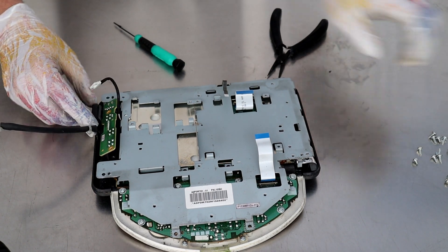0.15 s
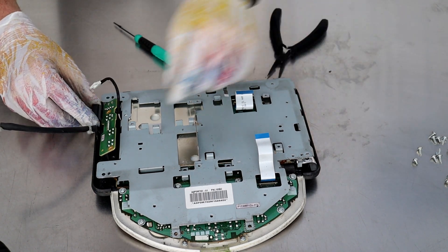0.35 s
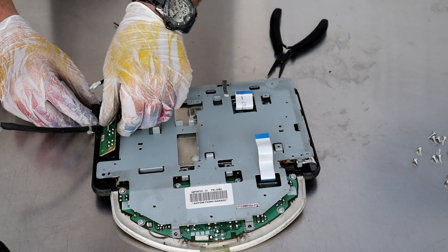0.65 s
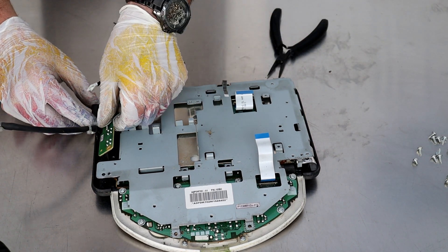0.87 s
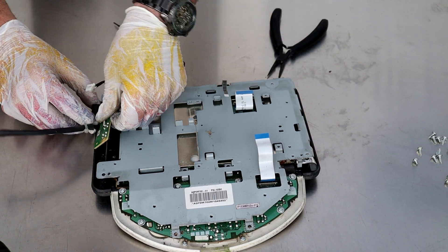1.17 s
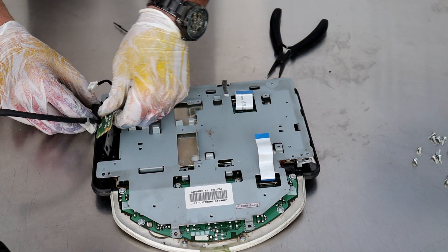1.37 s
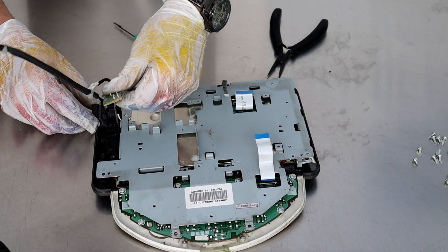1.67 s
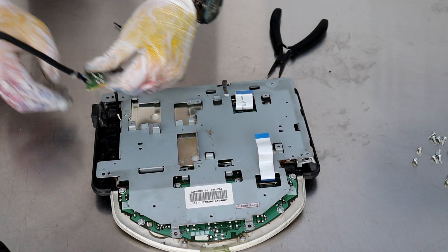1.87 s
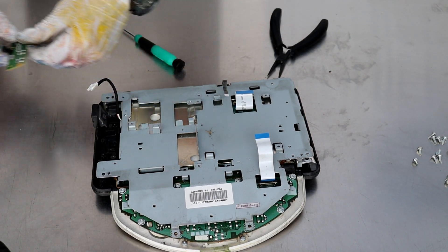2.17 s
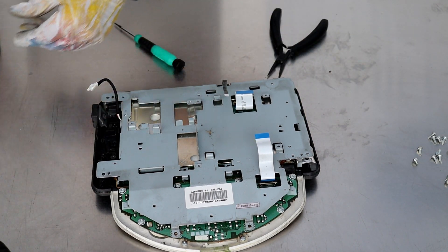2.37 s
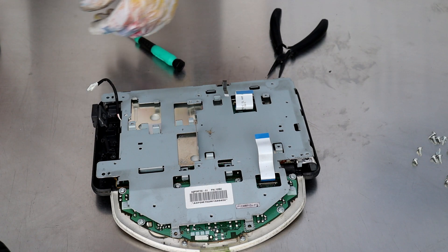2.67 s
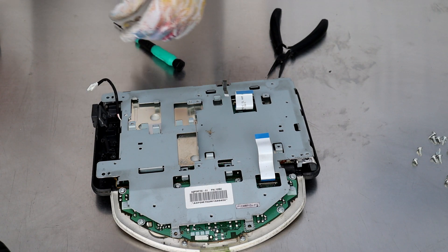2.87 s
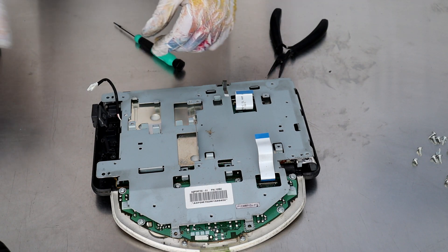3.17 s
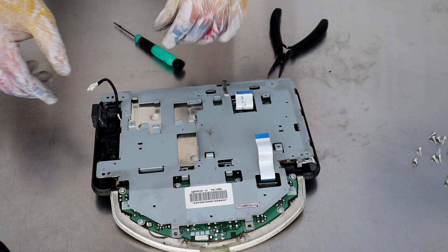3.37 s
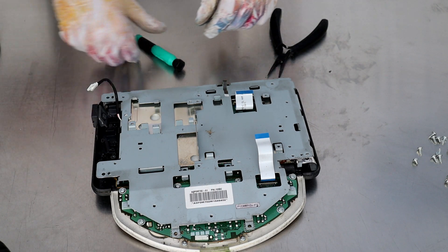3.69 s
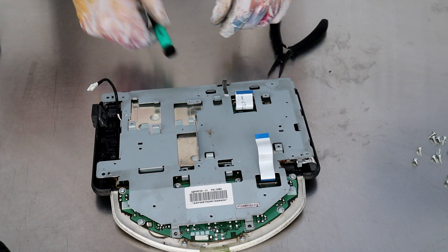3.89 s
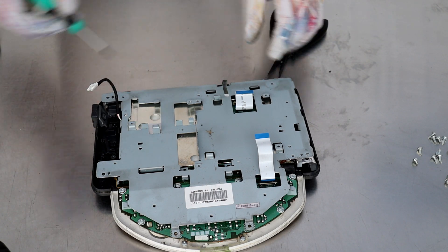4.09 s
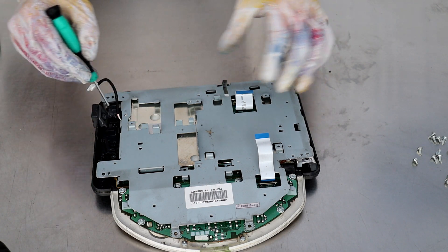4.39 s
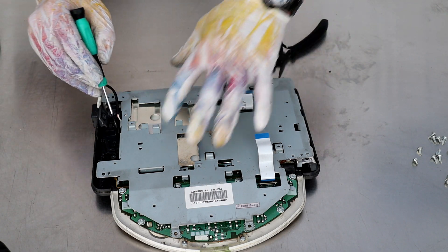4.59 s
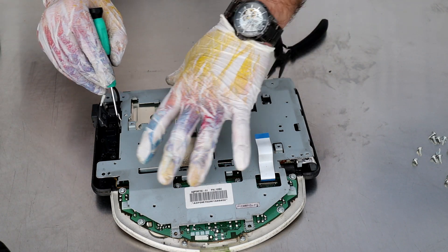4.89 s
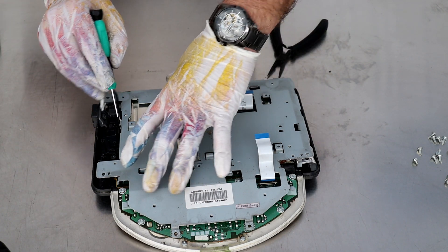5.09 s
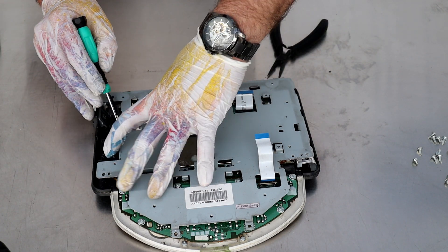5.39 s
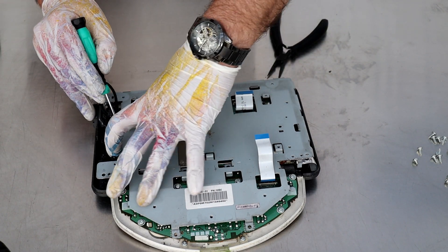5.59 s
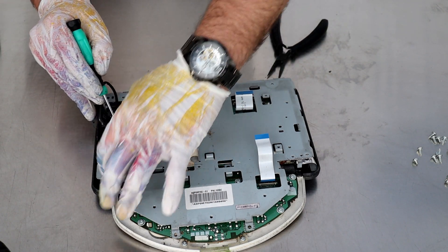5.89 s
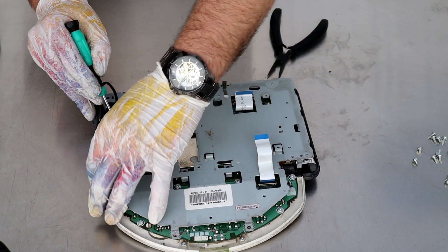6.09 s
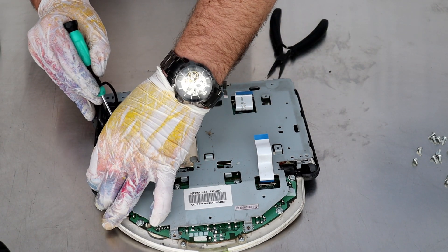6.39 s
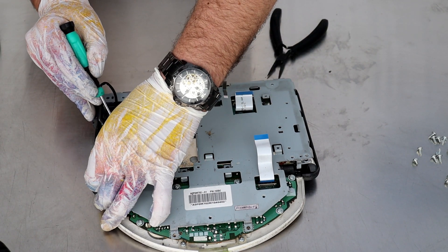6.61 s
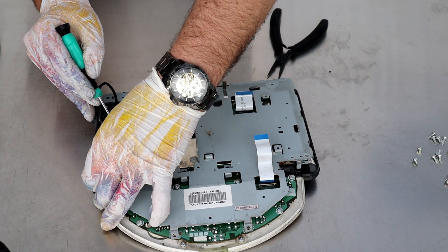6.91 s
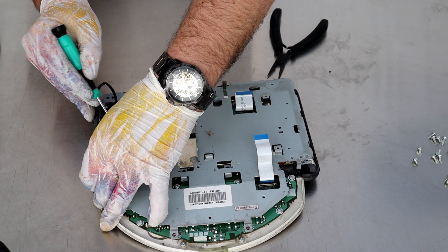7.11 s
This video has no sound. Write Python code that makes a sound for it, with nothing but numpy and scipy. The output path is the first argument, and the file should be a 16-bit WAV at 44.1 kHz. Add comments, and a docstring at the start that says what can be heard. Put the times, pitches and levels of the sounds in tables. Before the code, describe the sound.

Gloved hands work a metal and plastic panel on a steel table: thin squeak, sharp snaps, scattered clacks, glove rustle, and a hard closing knock.

```python
"""Stripping a panel in a small workshop

Gloved hands pull parts off a panel of sheet metal and plastic on a steel table. Knocks and snaps are noise
bursts that ring the modes of the panel and chatter on; thin gloves rustle and crackle as gritty noise;
a small board squeaks along its slot in thin high modes. A short diffuse tail is the room, and shaped noise
is its ventilation and the microphone hiss."""
import sys
import numpy as np
from scipy import signal
from scipy.fft import rfft, irfft
from scipy.io import wavfile
from scipy.ndimage import uniform_filter1d

SR = 44100
rng = np.random.default_rng(int(sys.argv[2]) if len(sys.argv) > 2 else 0)


def digitize_waveform(pressure):
    """Quantize a signal to 16-bit integers and store it at the path in sys.argv[1].

    Rows of a 2-D input are taken as channels; values are limited to [-1, 1].
    """
    field = np.atleast_2d(pressure).T
    bounded = np.clip(field, -1, 1)
    quanta = np.round(bounded * 32767).astype(np.int16)
    wavfile.write(sys.argv[1], SR, quanta)


N = 319725

# Ventilation and microphone hiss. Each row: frequency in Hz, relative density in dB per Hz.
AIR_SPECTRUM = [(15, -36), (25, -14), (76, -5), (170, -14.5), (236, -12), (317, -14.5), (503, -13),
                (659, -16.5), (775, -13.5), (1480, -19), (1790, -26.5), (5000, -40.5), (8830, -36),
                (16000, -38.5)]
# Decay of the workshop. Each row: frequency in Hz, time to fall by 60 dB in s.
ROOM_DECAY = [(150, 0.57), (400, 0.25), (1000, 0.28), (2800, 0.29), (7000, 0.22), (14000, 0.12)]
# Modes of the small board. Each row: frequency in Hz, width in Hz, relative level in dB.
BOARD_MODES = [(7050, 70, 0), (9260, 90, -5), (12100, 80, -14)]
# Creases of the glove that snap. Each row: start in seconds, peak in dB, pitch in Hz.
CREASE_SNAPS = [(3.6162, -52, 5200), (3.7579, -53, 4040), (3.7833, -44, 4400), (3.9067, -42.5, 4160),
                (3.9533, -46, 2920), (4.0123, -53, 2770), (4.0927, -40.5, 4800), (4.1024, -46, 5170),
                (4.4164, -43.5, 5300), (4.4353, -51, 5380), (4.4843, -49, 3780), (4.5144, -56, 4170),
                (4.5361, -50, 5700), (4.6364, -52, 5850)]
# Course of the glove rustle. Each row: time in seconds, level in dB.
GLOVE_LEVELS = [(0.0, -56), (0.5, -64.5), (1.4, -66.5), (1.65, -72.5), (2.1, -67.5), (2.5, -73), (2.9, -55),
                (3.0, -73), (3.7, -73), (3.8, -60), (4.0, -64), (4.25, -71), (4.5, -65.5), (5.05, -70),
                (5.85, -63), (6.05, -73), (6.5, -66), (6.8, -77), (7.25, -67)]
# Soft resonances of the glove film. Each row: frequency in Hz, width in Hz, relative level in dB.
GLOVE_MODES = [(2560, 4000, -1.5), (3780, 6600, -8.5), (5710, 340, -3), (8200, 7500, 5)]
# Short rubs of a glove finger. Each row: middle in seconds, level at the middle in dB,
# half length in seconds, part above 8 kHz against the dull rustle in dB.
FINGER_RUBS = [(0.016, -68, 0.036, 1), (0.578, -54.5, 0.017, -1.5), (0.735, -60, 0.053, -12),
               (0.881, -48.5, 0.04, -1.5), (1.044, -68, 0.028, -13), (1.122, -56, 0.023, -3),
               (1.796, -58.5, 0.015, -6), (1.99, -79, 0.043, -25), (2.113, -69, 0.0086, -18),
               (3.793, -72, 0.022, -20), (3.862, -54.5, 0.022, -11), (4.1, -68, 0.022, -12),
               (4.2, -53.5, 0.016, -5), (4.475, -70.5, 0.03, -16), (5.466, -57.5, 0.016, 0),
               (5.82, -65, 0.018, 1), (6.074, -58.5, 0.019, -14)]
# Modes of panel and table. Each row: frequency in Hz, width in Hz, relative level in dB.
PANEL_MODES = [(130, 31, -28), (233, 190, 4), (255, 15, -16), (418, 51, 7), (474, 150, 2), (736, 100, 2),
               (970, 105, 2.5), (1310, 540, -1.5), (1674, 154, -3.5), (2160, 170, -2.5), (2770, 31, 6),
               (3095, 77, 2), (3420, 100, -31), (4110, 900, -3), (4630, 120, -4), (5670, 62, 0),
               (6380, 300, 0.5), (7200, 1400, -3.5), (8660, 44, -7), (9700, 180, -6), (10330, 51, -2),
               (12700, 270, -7)]
# Knocks. Each row: time in seconds, crack peak in dB, thud, body and tick peaks against the crack in dB,
# where thud, body and crack ring most in Hz, chatter time in seconds.
KNOCK_EVENTS = [(0.3445, -41.5, -8.5, -5, -7.5, 504, 880, 3370, 0.007),
                (1.0219, -40, -23, -31, -10.5, 495, 950, 5300, 0.016),
                (1.049, -48.5, -8, 9, -6, 234, 918, 3060, 0.033),
                (1.0988, -34, -16, -2.5, -32, 410, 900, 2980, 0.0086),
                (1.1164, -41.5, -10, 7, -6, 393, 876, 2630, 0.0059),
                (1.2235, -50, -3, 4, -18, 374, 935, 2480, 0.0045),
                (1.2506, -42, -17, 7, -29, 299, 940, 2480, 0.0055),
                (1.281, -42.5, -7, 0, -15, 436, 930, 2650, 0.0097),
                (1.3512, -25, -17.5, -9.5, -15, 360, 940, 3800, 0.01),
                (1.4313, -48, 0, -21, -13, 420, 684, 2510, 0.0076),
                (1.4491, -13, -15, 0.5, -12.5, 458, 930, 3700, 0.011),
                (1.4556, -17.5, -10.5, -12, 1.5, 384, 940, 2600, 0.0069),
                (1.4811, -17.5, -12, -23, -11.5, 386, 1590, 2880, 0.006),
                (1.514, -18, -30, -7, -24, 442, 1280, 3680, 0.0047),
                (1.519, -21.5, -26, -20, -21, 444, 890, 2800, 0.0065),
                (2.2221, -33.5, -20, -7, 8.5, 370, 1080, 4500, 0.0031),
                (2.485, -49.5, -16, -7, -7, 280, 1960, 2440, 0.032),
                (2.6528, -40.5, -7.5, -6, -3, 420, 940, 4050, 0.014),
                (2.7656, -36, -39, -6.5, -8, 237, 1860, 5740, 0.0053),
                (2.8188, -20, -21.5, -6.5, -19, 465, 1310, 3300, 0.015),
                (2.925, -36, -17, -0.5, -30, 420, 1350, 2320, 0.021),
                (3.025, -29, -4.5, -0.5, -5, 202, 600, 4100, 0.0087),
                (3.0393, -20.5, -10, -6, -11.5, 390, 656, 5430, 0.0098),
                (3.0504, -26, -4, 1, -18, 225, 1250, 3350, 0.016),
                (3.0699, -35, 0, 0, -24, 396, 650, 2300, 0.013),
                (3.0997, -43, 1, 7.5, -18, 229, 620, 4470, 0.014),
                (3.993, -44.5, -33, -3, -8, 200, 2260, 5100, 0.004),
                (4.122, -39, -39, -1, -14, 200, 2360, 4850, 0.0075),
                (4.8264, -42, -0.5, 4.5, -33, 470, 1220, 3070, 0.024),
                (4.9311, -30, -15.5, -3.5, -10.5, 396, 1270, 4830, 0.01),
                (5.2035, -30, -30, -13, -17, 434, 895, 3200, 0.014),
                (5.2341, -41.5, -3, 6.5, -12, 390, 856, 2890, 0.02),
                (5.2949, -32.5, -13, 5, -13, 557, 864, 2700, 0.021),
                (5.3168, -20.5, -19.5, 2, -5.5, 610, 1210, 3520, 0.0067),
                (5.3319, -23, -35, -26, -24, 598, 1140, 2570, 0.0066),
                (5.578, -42, -20, -3, -18, 580, 980, 4740, 0.012),
                (5.587, -21, -28, -6, -7.5, 574, 990, 5000, 0.012),
                (5.7384, -45.5, -17, -4, -26, 413, 844, 2810, 0.019),
                (5.9295, -45.5, -22, -22, -11, 404, 937, 5470, 0.015),
                (6.095, -44.5, -14, -2, -14, 428, 780, 2420, 0.01),
                (6.133, -42.5, 4.5, 0.5, -17, 428, 690, 5900, 0.035),
                (6.1555, -32, -6, -9.5, 5.5, 384, 1060, 2500, 0.011),
                (6.2397, -17, -21.5, 0, 0, 264, 2030, 3590, 0.0062),
                (6.2517, -30, -8, 2, -24, 275, 2270, 5250, 0.012),
                (6.3331, -48.5, 2.5, 9, -11, 275, 930, 2760, 0.011),
                (6.576, -62, 15, 16.5, -14, 460, 900, 5060, 0.011),
                (6.7106, -51, -5, 1, -35, 552, 1030, 3090, 0.014),
                (6.768, -37, -7, -2.5, -24, 388, 750, 3650, 0.011),
                (6.9255, -47.5, 1, 4, -36, 398, 840, 3360, 0.011),
                (7.0541, -45, -3.5, 4.5, -33, 384, 780, 3300, 0.013),
                (7.1845, -15.5, -11, -2.5, -16, 385, 796, 4940, 0.013),
                (7.219, -4.5, -16.5, -9.5, -5, 447, 1056, 3520, 0.0052),
                (7.237, -20.5, -7, 0, -20, 334, 746, 3160, 0.0071)]
# Lift of the strongest ring. One row: thud, body and crack in dB.
FOCUS_LIFT = (11, 10, 6.5)

AIR_DB = -57.5
ROOM_DB, ROOM_GAP_S = -10, 0.004
SCRAPE_DB, SCRAPE_WAVER_DB = -61, 4  # squeak level; scale of each mode's waver
SCRAPE_START_S, SCRAPE_ATTACK_S, SCRAPE_HOLD_S, SCRAPE_RELEASE_S = 0.66, 0.055, 0.18, 0.06
CREASE_DECAY_S, CREASE_WIDTH_HZ = 0.0016, 1700
BRIGHT_DB = -6.5  # steady rustle: part above 8 kHz against the dull part
SNAP_DECAY_S, SNAP_DB = 0.00069, 3.5  # bare snap of the contact
CHATTER_DB, CHATTER_RISE_S = -5.5, 0.002  # loose parts under the snap
THUD_RATIO = 0.62  # time constant of the thud against the chatter time
FOCUS_OCTAVES = 0.15  # reach of the strongest ring
MODE_SCATTER_DB, DETUNE = 2.5, 0.012  # random spread per knock: mode level; pitch as a fraction
TICK_HZ = 9500
CEILING, TOP_HZ = 0.48, 16400  # recorder: limit of the rounded peaks; upper edge


def undb(db):
    """Decibels to gain."""
    return 10 ** (np.asarray(db) / 20)


def unit(x):
    """Scale to rms 1."""
    return x / np.sqrt(np.mean(x ** 2))


def along(s, values):
    """A curve read at every sample."""
    return np.interp(np.arange(N) / SR, s, values)


def resonate(x, modes):
    """Sum of band-pass resonances given as (Hz, width Hz, dB)."""
    out = 0
    for hz, width, db in modes:
        b, a = signal.iirpeak(hz, hz / width, fs=SR)
        out = out + undb(db) * signal.lfilter(b, a, x)
    return out


def walk(rate):
    """Random levels, rate of them per second, joined by straight slopes; spread near 1."""
    hold = int(SR / rate)
    steps = np.repeat(rng.standard_normal(N // hold + 1), hold)
    return 1.45 * uniform_filter1d(steps, hold)[:N]


def grit(spread_db):
    """Noise whose samples have a long-tailed size: dense clicks."""
    return rng.standard_normal(N) * undb(spread_db * rng.exponential(size=N))


def air():
    """Ventilation and microphone hiss: noise in octave bands, the low ones wavering a little more."""
    hz, db = np.transpose(AIR_SPECTRUM)
    octave = np.log2(np.arange(1, N // 2 + 2) * SR / N)
    colour = rfft(rng.standard_normal(N)) * undb(np.interp(octave, np.log2(hz), db))
    out = np.zeros(N)
    for centre in np.arange(4., 16):
        band = irfft(colour * np.clip(1 - np.abs(octave - centre), 0, 1), N)
        waver_db = np.interp(centre, (9, 12), (1.2, .4))
        out += band * undb(waver_db * walk(4.03))
    return undb(AIR_DB) * unit(out)


def room(x, size=22050):
    """The workshop's diffuse tail: bands of noise that decay each at their own rate, treble soonest."""
    t = np.arange(size) / SR
    hz, t60 = np.transpose(ROOM_DECAY)
    octave = np.log2(np.arange(1, size // 2 + 2) * SR / size)
    noise = rfft(rng.standard_normal(size))
    tail = np.zeros(size)
    for one, decay in zip(np.eye(len(hz)), t60):
        band = irfft(noise * np.interp(octave, np.log2(hz), one))
        tail += band * 1000 ** (-t / decay)
    tail *= np.clip(t / ROOM_GAP_S - 1, 0, 1)  # the walls answer after a short gap
    tail /= np.sqrt(np.sum(tail ** 2))
    return signal.fftconvolve(x, undb(ROOM_DB) * tail)[:N]


def scrape():
    """The edge of the board slips along its slot; gritty friction sings in thin high modes."""
    corners = np.cumsum([SCRAPE_START_S, SCRAPE_ATTACK_S, SCRAPE_HOLD_S, SCRAPE_RELEASE_S])
    slide = along(corners, [0, 1, 1, 0])
    slip = grit(1.6)
    squeak = np.zeros(N)
    for mode in BOARD_MODES:  # each mode comes and goes on its own
        squeak += undb(SCRAPE_WAVER_DB * walk(14.9)) * resonate(slip, [mode])
    return slide * undb(SCRAPE_DB) * unit(squeak)


def creases(size=1024):
    """A fold of the glove snaps through: a tiny burst in one soft band."""
    out, t = np.zeros(N + size), np.arange(size) / SR
    for s, db, hz in CREASE_SNAPS:
        band = [(hz, CREASE_WIDTH_HZ, 0)]
        burst = rng.standard_normal(size) * np.exp(-t / CREASE_DECAY_S)
        snap = resonate(resonate(burst, band), band)
        start = int(s * SR)
        out[start:start + size] += undb(db) * snap / np.abs(snap).max()
    return out[:N]


def gloves():
    """Rubber film rubs: gritty noise in a few soft resonances, in uneven puffs."""
    t = np.arange(N) / SR
    rub = grit(2.8) * undb(2.0 * walk(40))
    film = resonate(rub, [(4070, 3300, 0)])
    dull = unit(resonate(film, GLOVE_MODES))
    treble = signal.butter(2, 8000, "high", fs=SR, output="sos")
    bright = unit(signal.sosfilt(treble, rub))
    out = undb(along(*np.transpose(GLOVE_LEVELS))) * (dull + undb(BRIGHT_DB) * bright)
    for middle, db, half, bright_db in FINGER_RUBS:
        puff = np.exp(-((t - middle) / half) ** 2)
        out += undb(db) * puff * (dull + undb(bright_db) * bright)
    return out


def panel_ring(t):
    """Decaying sines of panel and table, shifted a little per knock as hands hold the panel."""
    hz, width, mode_db = np.transpose(PANEL_MODES)
    gain = undb(mode_db + MODE_SCATTER_DB * rng.standard_normal(len(hz))) * width / SR * 2 * np.pi
    held_hz = hz * (1 + DETUNE * rng.standard_normal(len(hz)))
    decay = np.exp(-np.pi * np.outer(width, t))
    ring = gain @ (decay * np.sin(2 * np.pi * np.outer(held_hz, t)))
    ring[0] += undb(SNAP_DB)
    return ring


def knocks(size=4096, lead=256):
    """Each blow is a snap with loose parts chattering behind; where it lands decides which modes ring most."""
    out, t = np.zeros(N + size), np.arange(size) / SR
    octave = np.log2(np.arange(1, size + 2) * SR / 2 / (size + 1))
    fade_in = np.clip(np.arange(size) / lead, 0, 1) ** 2
    for s, crack_db, thud_db, body_db, tick_db, *focus_hz, chatter_s in KNOCK_EVENTS:
        noise = rng.standard_normal(size)
        chatter = (1 - np.exp(-t / CHATTER_RISE_S)) * np.exp(-t / max(chatter_s, .001))
        push = noise * (np.exp(-t / SNAP_DECAY_S) + undb(CHATTER_DB) * chatter)
        # the heavy table follows late and softly
        sway = noise * t * np.exp(-t / max(THUD_RATIO * chatter_s, .001))
        focus_db = np.zeros(size + 1)
        for hz, lift_db in zip(focus_hz, FOCUS_LIFT):
            focus_db += lift_db * np.exp(-((octave - np.log2(hz)) / FOCUS_OCTAVES) ** 2)
        colour = rfft(panel_ring(t), 2 * size) * undb(focus_db)
        blow = rfft(push, 2 * size) * colour
        thud = rfft(sway, 2 * size) * colour
        # thud, body, crack and tick share the spectrum in crossfaded bands
        centres = np.log2([75, *focus_hz, TICK_HZ, SR / 2])
        sources, levels = (thud, blow, blow, blow), (thud_db, body_db, 0, tick_db)
        start = int(s * SR) - lead  # narrow bands swell up a little ahead of the snap
        for one, source, db in zip(np.eye(6)[1:5], sources, levels):
            band = np.sin(np.pi / 2 * np.interp(octave, centres, one)) ** 2
            part = np.roll(irfft(source * band), lead)[:size] * fade_in
            out[start:start + size] += undb(crack_db + db) * part / np.abs(part).max()
    return out[:N]


def scene():
    """Hands at the table, their echo and the air of the room."""
    hands = knocks() + gloves() + creases() + scrape()
    return (hands + room(hands) + air())[None]


def record(dry):
    """The recorder rounds the loudest peaks and cuts the top steeply."""
    rounded = CEILING * np.tanh(dry / CEILING)
    top_cut = signal.ellip(10, .2, 70, TOP_HZ, fs=SR, output="sos")
    return signal.sosfilt(top_cut, rounded)


dry = scene()
out = record(dry)
digitize_waveform(out)
```